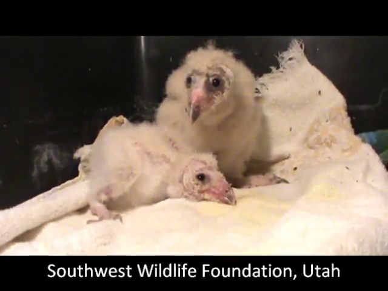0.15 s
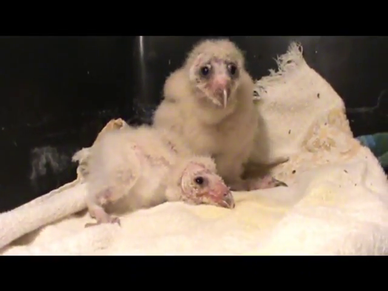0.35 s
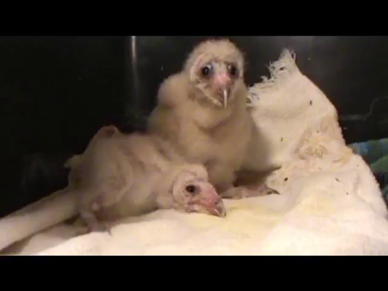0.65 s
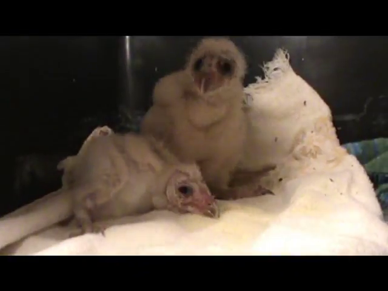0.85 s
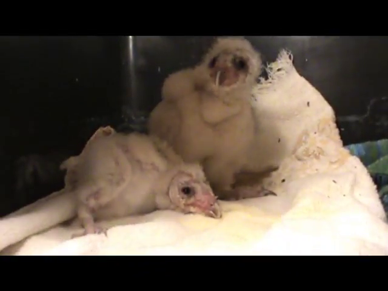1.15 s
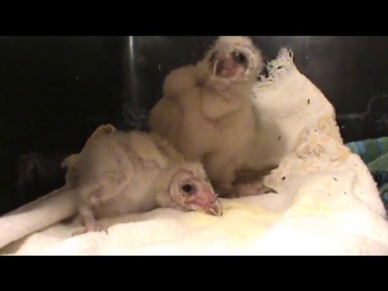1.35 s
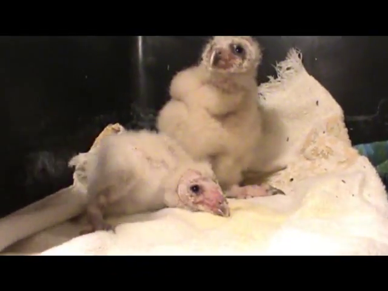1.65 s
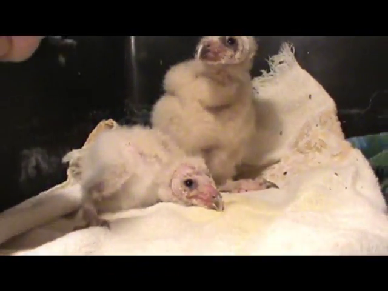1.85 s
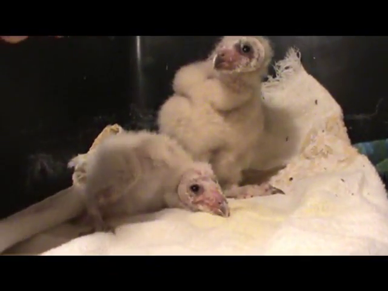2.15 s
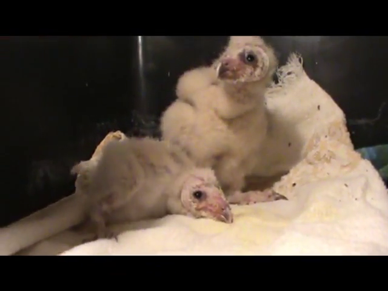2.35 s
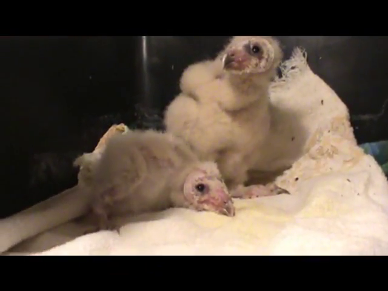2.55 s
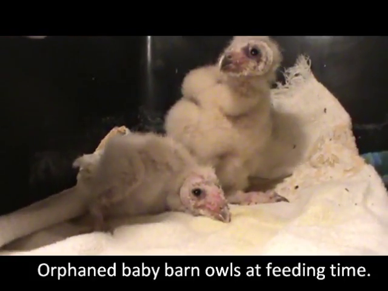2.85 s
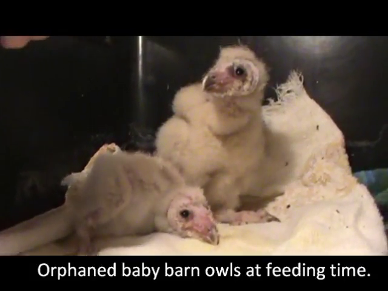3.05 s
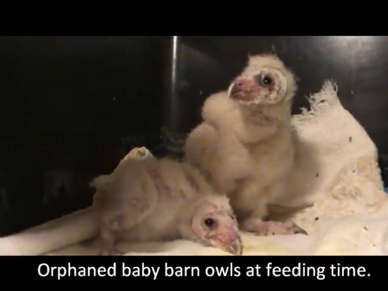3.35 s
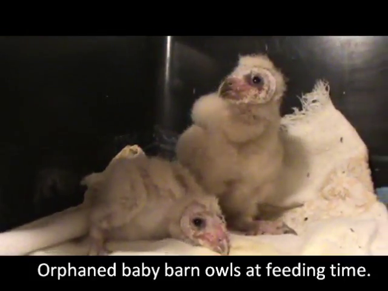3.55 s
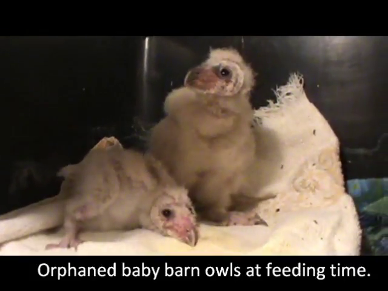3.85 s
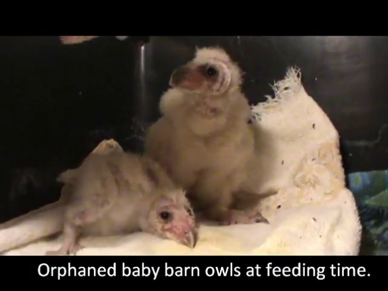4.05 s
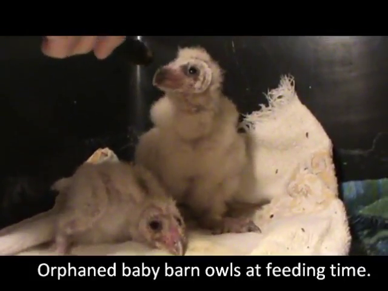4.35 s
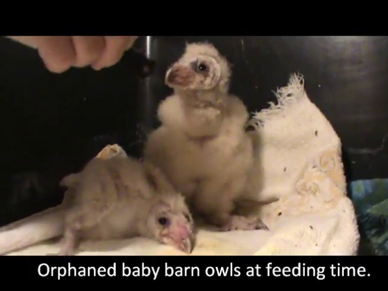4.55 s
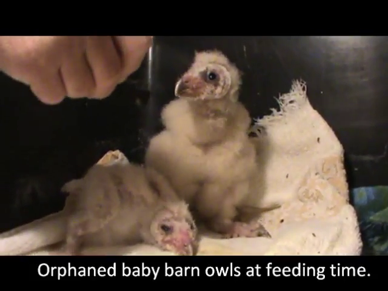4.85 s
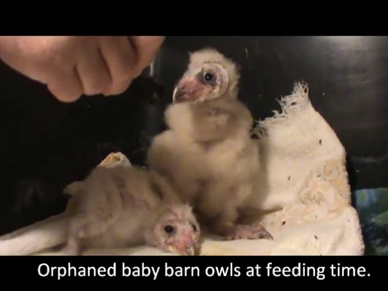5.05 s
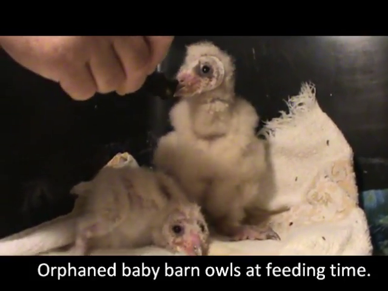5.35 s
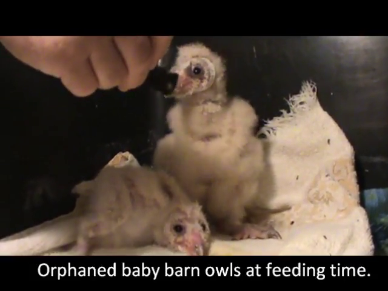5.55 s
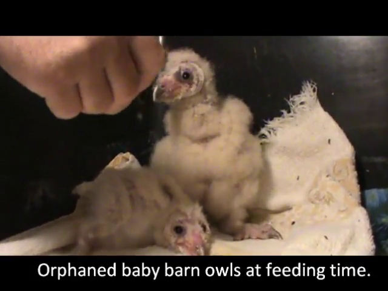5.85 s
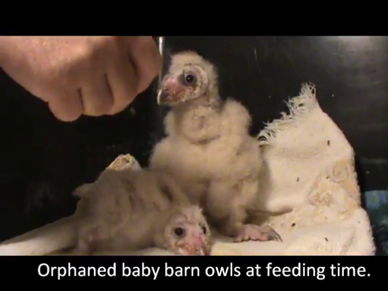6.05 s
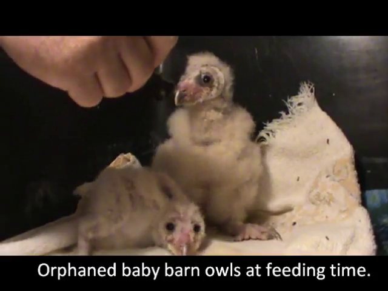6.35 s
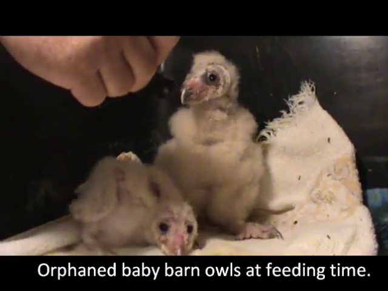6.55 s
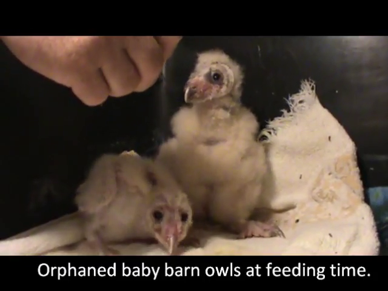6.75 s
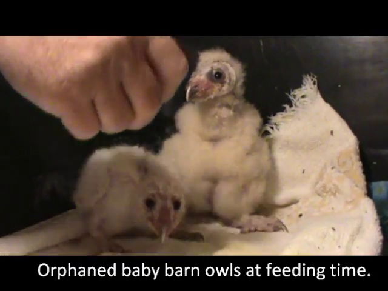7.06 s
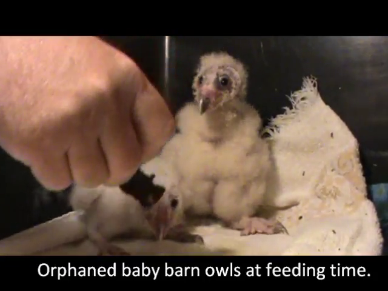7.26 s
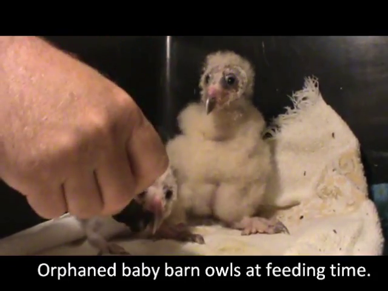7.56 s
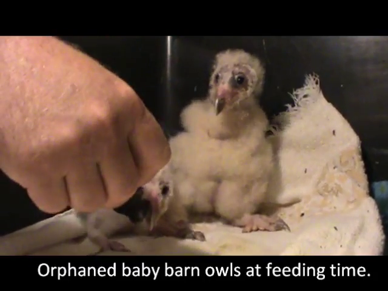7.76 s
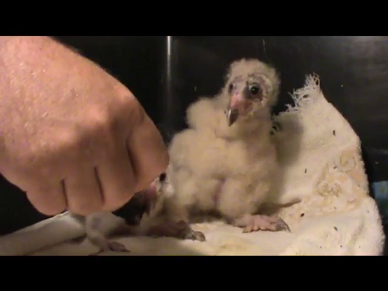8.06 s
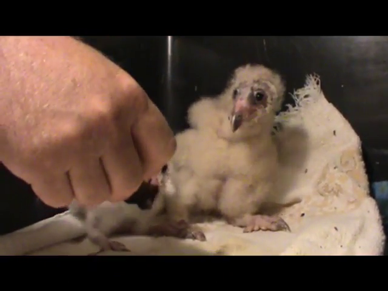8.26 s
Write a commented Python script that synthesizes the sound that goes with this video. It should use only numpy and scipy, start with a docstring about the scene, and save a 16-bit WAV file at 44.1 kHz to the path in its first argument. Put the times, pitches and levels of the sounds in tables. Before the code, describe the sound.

Close stereo microphones in a small towel-lined steel cage indoors. After cloth rustling and a faint wheeze, a barn owl chick gives eight shrill trills, each about six tenths of a second, nearly one per second. Each is a fast chain of arched whistles with a piercing higher tone and raspy edge. Between them come towel shifts, tiny taps, scuffs and soft bumps, over quiet moving air and machine hum.

```python
"""Owl chick begging in a cage

A barn owl chick begs close by, in a steel cage lined with towels: a faint wheeze, then eight chittering trills.
Each trill is a chain of arched whistles; round the crests a second sine tone and puffs of raspy noise join in.
Echo taps and a short dense ring throw the sounds back. The towel rustles in swelling noise, taps and bumps
are damped sines, scuffs are dying noise, and steady sines hum like a machine over the noise of moving air."""
import sys
import numpy as np
from scipy import signal
from scipy.fft import rfft, irfft, next_fast_len
from scipy.io import wavfile
from scipy.ndimage import uniform_filter1d

SR = 44100
rng = np.random.default_rng(int(sys.argv[2]) if len(sys.argv) > 2 else 0)


def dump(signal):
    """Clip the signal to [-1, 1] and save it as 16-bit WAV at the path in sys.argv[1]."""
    limited = np.clip(np.atleast_2d(signal).T, -1, 1)
    pcm = np.round(limited * 32767).astype(np.int16)
    wavfile.write(sys.argv[1], SR, pcm)


N = 371322
TIME = np.arange(N) / SR
SIZE = next_fast_len(N, real=True)
FREQS = np.fft.rfftfreq(SIZE, 1 / SR)

# Spectrum of the moving air: (frequency [Hz], relative level [dB])
ROOM_COLOUR = [(15, -58), (25, -13.5), (69, -8.5), (108, -4), (169, -8.5), (351, -17.5), (445, -19.5),
               (494, -11.5), (676, -29.5), (812, -17), (975, -24), (1920, -25.5), (2930, -29), (3610, -42),
               (13000, -55)]
# Steady partials of the machine: (frequency [Hz], rms level [dB])
HUM_PARTIALS = [(100.7, -60), (118.3, -64), (201, -69), (240, -67), (1120, -80), (1906, -79), (2519, -80)]
# Likeness of left and right in diffuse noise: (frequency [Hz], likeness [0-1])
STEREO_LIKENESS = [(100, 1), (300, 0.89), (600, 0.35), (1200, 0.043), (3000, 0.31), (12000, 0.9)]
# Spectrum of the rustling towel: (frequency [Hz], relative level [dB])
TOWEL_COLOUR = [(100, -15), (200, -11.5), (340, -1), (410, -12.5), (500, -6), (700, -10), (1280, -13.5),
                (2500, -14), (3300, -15.5), (8000, -19), (13000, -22)]
# Shifts on the towel: (middle [s], half length to 1/e of the power [s], level [dB])
RUSTLES = [(0.49, 0.084, -51), (0.89, 0.2, -59.5), (1.52, 0.13, -52), (2.16, 0.38, -57), (3.246, 0.13, -59),
           (3.725, 0.56, -51.5), (4.4, 0.28, -76), (6.396, 0.3, -63), (7.34, 0.093, -54.5)]
# Spectrum of the faint wheeze: (frequency [Hz], relative level [dB])
WHEEZE_COLOUR = [(2700, -40), (3150, 0), (3350, 0), (3800, -40), (13000, -70)]
# Beat of each trill:
# (start [s], end [s], first trough [s], arch length [s], slowing [s per arch], rising share of an arch [0-1])
TRILL_BEATS = [(0.906, 1.522, 0.902, .079, 0, .71), (1.924, 2.562, 1.944, .0815, 0, .69),
               (2.871, 3.520, 2.887, .0775, .001, .65), (3.840, 4.398, 3.853, .0786, 0, .68),
               (4.781, 5.396, 4.796, .0797, 0, .59), (5.720, 6.289, 5.738, .080, 0, .64),
               (6.761, 7.437, 6.788, .086, -.001, .70), (7.812, 8.405, 7.829, .084, 0, .69)]
# Voice of each trill: (first trough pitch [Hz], swing before narrowing [Hz], octave level before the throat [dB],
# second tone base pitch [Hz], extra level at the onset [dB])
TRILL_VOICES = [(3380, 1012, -8, 7100, -8.5), (3610, 960, -5.5, 7260, -5.5), (3430, 920, -6.5, 7420, -10),
                (3404, 980, -7.5, 7640, -13), (3723, 670, -0.5, 7480, -5.5), (3504, 780, -1, 6720, 0),
                (4040, 750, -3, 6900, 5.5), (3530, 766, -7, 6980, -7.5)]
# How each trill is pushed, one list per trill; levels are drives, shaped further on:
# (time [s], crest pitch [Hz], whistle level [dB], second tone level [dB], rasp level [dB])
TRILL_EFFORTS = [
    [(0.96, 4610, -35.5, -39.5, -56), (1.03, 4575, -35, -34, -46.5), (1.11, 4494, -35, -34, -58),
     (1.27, 4452, -32.5, -31, -50.5), (1.44, 4460, -32, -30.5, -46.5), (1.50, 4394, -29, -54, -62)],
    [(2.00, 4540, -36, -34.5, -51.5), (2.25, 4493, -32.5, -26, -46.5), (2.42, 4567, -32, -24.5, -39.5),
     (2.48, 4424, -35.5, -55, -65), (2.55, 4110, -30, -70, -70)],
    [(2.93, 4805, -32.5, -29.5, -62), (3.01, 4600, -31, -25.5, -41.5), (3.18, 4570, -30.5, -25.5, -43.5),
     (3.26, 4547, -29.5, -32, -54), (3.50, 4450, -26.5, -39, -53)],
    [(3.91, 4925, -26.5, -31, -48), (4.13, 4640, -27.5, -25, -44.5), (4.23, 4800, -25.5, -22.5, -45),
     (4.31, 4790, -28, -41, -42.5), (4.37, 4430, -30, -62, -77.5)],
    [(4.85, 4677, -33, -32, -43.5), (5.09, 4490, -31, -34.5, -46.5), (5.25, 4388, -33, -56, -46),
     (5.33, 4410, -35.5, -60, -58), (5.39, 4010, -38.5, -70, -75)],
    [(5.79, 4670, -39, -47, -60), (5.87, 4565, -33.5, -60, -44.5), (6.20, 4460, -33.5, -39, -50.5),
     (6.27, 4336, -33.5, -71, -77)],
    [(6.82, 4405, -44, -77, -68), (7.11, 4340, -34, -42, -52.5), (7.18, 4550, -37, -44, -38.5),
     (7.30, 4678, -28.5, -36, -50), (7.42, 4430, -31.5, -62, -61)],
    [(7.90, 4460, -36.5, -60, -68), (7.97, 4576, -36.5, -36.5, -57), (8.05, 4257, -32.5, -71, -68),
     (8.23, 4330, -33, -33.5, -56), (8.38, 4170, -34.5, -78, -76)],
]
# Gain of throat and beak on the whistle and its overtones: (frequency [Hz], gain [dB])
THROAT_GAIN = [(3300, 11), (3600, -0.5), (3950, 6.5), (4350, 3), (4600, -2.5), (4800, -11), (5100, -24),
               (7000, -4), (8800, 4), (9400, -10.5), (10800, 5.5), (13000, -28.5)]
# Spectrum of the turbulence that rides on the whistle: (frequency [Hz], relative level [dB])
HISS_COLOUR = [(2000, -30), (3500, 1), (5000, -8), (6500, -16), (8500, 10), (10000, -6), (11500, 7),
               (13000, 2)]
# Spectrum of the rasp: (frequency [Hz], relative level [dB])
RASP_COLOUR = [(2000, -47), (3400, -21), (4500, 1.5), (5200, -6), (6200, 1), (7500, 2), (8700, 8),
               (9500, -8.5), (10300, -0.5), (11500, -16.5), (13000, -25)]
# First echoes from the steel walls: (delay [s], gain [ratio])
WALL_ECHOES = [(.0006, 0.026), (.00135, 0.21), (.00245, 0.34), (.0032, 0.21), (.0075, 0.27), (.0082, 0.053),
               (.014, 0.11)]
# Light taps with a hollow ring: (time [s], peak level before the cage [dB])
TAPS = [(1.712, -52), (2.174, -52), (2.316, -48.5), (2.502, -30.5), (4.127, -43), (4.193, -47.5),
        (4.436, -52), (4.459, -47.5), (4.52, -41.5), (4.67, -56), (5.47, -58)]
# Modes of that ring: (frequency [Hz], relative level [dB], 60 dB decay time [s])
TAP_MODES = [(755, 4.5, 0.039), (840, 10, 0.016), (970, 5, 0.017), (1140, -17, 0.028)]
# Soft bumps on the padded floor: (time [s], level before contact and decay [dB], frequency [Hz])
BUMPS = [(2.956, -46, 268), (3.143, -43, 257), (3.146, -43, 614), (3.158, -32.5, 167), (3.292, -32.5, 313),
         (3.31, -40.5, 263)]
# Short scuffs of beak and claws: (time [s], starting level [dB], 60 dB decay time [s])
SCUFFS = [(1.71, -41.5, 0.031), (2.174, -39.5, 0.049), (2.598, -48.5, 0.096), (3.148, -51, 0.24),
          (3.326, -48.5, 0.16), (5.837, -50, 0.16), (5.999, -51, 0.1), (6.399, -51, 0.18),
          (7.103, -50, 0.25), (7.829, -45, 0.13), (7.921, -44.5, 0.16)]
# Spectrum of the scuffs: (frequency [Hz], relative level [dB])
SCUFF_COLOUR = [(100, -16), (300, 3.5), (600, -3.5), (1100, -4), (2500, -6), (5000, -11), (13000, -47)]

ROOM_DB = -58.5
STIRRING_DB = -63.5  # down and towel are never quite still
WHEEZE_S, WHEEZE_HALF_S, WHEEZE_DB = 0.86, 0.08, -62.5  # middle, half length, level before the high-pass
TROUGH_POINT = 1.12  # exponent: arches have round tops and sharper troughs
NARROWING, NARROWING_S = .35, .11  # the swing shrinks by this share as the trill runs out
LEAD_HZ = 262  # a call slides gently down into its first trough
END_FALL_HZ, END_FALL_S = 524, 0.0247  # the pitch drops as the call gives out
ONSET_S, RELEASE_DB, RELEASE_S, GATE_S = 0.047, -6.5, 0.042, 0.0068
THIRD_DB = -21  # drive of the second overtone, before the throat
# the second tone and the rasp each sound in a window round each crest, centred slightly late
SECOND_LAG_S, SECOND_LENGTH_S, SECOND_EDGE_S = 0.0016, .023, 0.0015
SECOND_BEND, SECOND_BEND_S, SECOND_TOP_S = 0.068, .016, -0.00396  # droops by this share so far from its top
BEAT_TONE_DB = -22  # relative to the second tone
RASP_LAG_S, RASP_LENGTH_S, RASP_EDGE_S = 0.0017, 0.03, 0.0047
RASP_BOOST_DB, RASP_UNEVEN_DB, FULLY_ROUGH_DB = 7.5, 0.8, -49
HISS_DB = -28  # relative to the smoothed voice
BAND_EDGE_HZ = 13080


def amp(db):
    """Converts decibels to gain."""
    return 10 ** (np.asarray(db) / 20)


def unit(x):
    """Scales to rms 1."""
    return x / np.sqrt(np.mean(x ** 2) + 1e-20)


def read(points, hz):
    """Reads a curve on a log-frequency axis."""
    f, value = np.transpose(points)
    return np.interp(np.log(hz + 1), np.log(f), value)


def noise(colour, weight=1):
    """Noise of the given spectrum and rms 1, then weighted frequency by frequency."""
    gain = unit(amp(read(colour, FREQS)))
    spectrum = rfft(rng.standard_normal(SIZE)) * gain * weight
    return irfft(spectrum, SIZE)[:N]


def wide_noise(colour):
    """Diffuse noise at two microphones, shared and opposed parts set by the stereo likeness."""
    likeness = read(STEREO_LIKENESS, FREQS)
    mid = noise(colour, np.sqrt((1 + likeness) / 2))
    side = noise(colour, np.sqrt((1 - likeness) / 2))
    return np.array([mid + side, mid - side])


def wobble(count, rate_hz):
    """Smooth random motion of about rms 1, with little above the given rate."""
    hop = 16  # drawn at every 16th sample, then joined by straight lines
    size = next_fast_len(count // hop + 256)
    f = np.fft.rfftfreq(size, hop / SR)
    spectrum = rfft(rng.standard_normal(size)) * np.exp(-(f / rate_hz) ** 2)
    slow = unit(irfft(spectrum, size))
    return np.interp(np.arange(count) / hop, np.arange(size), slow)


def swell(t, half_s, edge_s):
    """A flat-topped window round t = 0 with soft edges."""
    return .5 - .5 * np.tanh((abs(t) - half_s) / edge_s)


def add(mix, s, sound):
    """Mixes a sound in at time s."""
    part = mix[max(round(s * SR), 0):][:len(sound)]
    part += sound[:len(part)]


def room():
    """Moving air as diffuse noise, and a machine hum of sines whose phases waver slightly."""
    hum = np.zeros(N)
    for hz, db in HUM_PARTIALS:
        waver = .5 * wobble(N, rate_hz=4.2)  # radians
        hum += amp(db) * np.sqrt(2) * np.sin(2 * np.pi * hz * TIME + waver)
    return hum + amp(ROOM_DB) * wide_noise(ROOM_COLOUR)


def towel():
    """Each shift swells and fades in power; fibres slip in small uneven clumps."""
    power = amp(STIRRING_DB) ** 2
    for s, half_s, db in RUSTLES:
        power = power + amp(db) ** 2 * np.exp(-((TIME - s) / half_s) ** 2)
    clumps = amp(1.02 * wobble(N, rate_hz=58))
    return np.sqrt(power) * clumps * wide_noise(TOWEL_COLOUR)


def wheeze():
    """A faint breath of narrow-band noise that leads into the first trill."""
    return amp(WHEEZE_DB) * swell(TIME - WHEEZE_S, WHEEZE_HALF_S, edge_s=0.013) * noise(WHEEZE_COLOUR)


def arches(t, first_s, period_s, slowing_s, rising):
    """The beat of a trill: steps (even at troughs, odd at crests) and the time from the arch's crest."""
    k = np.arange(-1, 11)
    troughs = first_s + period_s * k + slowing_s * k * (k - 1) / 2
    crests = troughs[:-1] + rising * np.diff(troughs)
    turns = np.c_[troughs[:-1], crests].ravel()
    step = np.interp(t, turns, np.arange(len(turns)) - 2)
    arch = np.maximum(step // 2, 0).astype(int) + 1
    return step, t - crests[arch]


def whistle_pitch(t, step, swing, opening_hz, swing_hz, crest_hz):
    """Pitch arches from trough to crest, after a slide in and before a last fall."""
    narrowing = NARROWING * np.exp((t - t[-1]) / NARROWING_S)
    trough_hz = np.where(step < 1, opening_hz, crest_hz - swing_hz * (1 - narrowing))
    arch_hz = (crest_hz - trough_hz) * swing * (step >= 0)
    lead_hz = LEAD_HZ * np.clip(-step, 0, 1)
    fall_hz = END_FALL_HZ * np.maximum(1 - (t[-1] - t) / END_FALL_S, 0) ** 2
    return trough_hz + arch_hz + lead_hz - fall_hz


def whistle(t, step, opening_hz, swing_hz, octave_db, crest_hz, level_db, rough):
    """A whistle and two overtones through the throat; rough (0-1) shakes the pitch and weakens the lowest."""
    swing = abs(np.sin(np.pi / 2 * step)) ** TROUGH_POINT
    hz = whistle_pitch(t, step, swing, opening_hz, swing_hz, crest_hz)
    jitter = .003 + .022 * rough ** 2  # rms share of the pitch
    phase = 2 * np.pi * np.cumsum(hz * (1 + jitter * wobble(len(t), rate_hz=790))) / SR
    # the downstroke is pushed hardest; the voice eases as it turns to climb again
    falling = np.clip(-np.sin(np.pi * step), 0, 1) * (step > 0)
    easing = np.exp(-((step % 2 - .15) / 0.39) ** 2)
    first_db = read(THROAT_GAIN, hz) + 4.3 * falling - 1.75 * easing - 0.68 * rough - 2.2
    second_db = read(THROAT_GAIN, 2 * hz) + octave_db - 7.0 * (1 - swing) - 0.75
    third_db = read(THROAT_GAIN, 3 * hz) + THIRD_DB + 2.9 * wobble(len(t), rate_hz=110)
    tone = amp(first_db) * np.sin(phase)
    tone += amp(second_db) * np.sin(2 * phase)
    tone += amp(third_db) * np.sin(3 * phase)
    flutter_db = 1.5 * wobble(len(t), rate_hz=120)
    return tone * amp(level_db + flutter_db), phase


def second_tone(from_crest, hz, db, whistle_phase):
    """A brief higher whistle arches with each crest and mixes with the main one into a third, higher tone."""
    t = from_crest - SECOND_LAG_S
    droop = SECOND_BEND * np.minimum(((t - SECOND_TOP_S) / SECOND_BEND_S) ** 2, 2)
    shake = .007 * wobble(len(t), rate_hz=700)
    drift = .008 * wobble(len(t), rate_hz=10)
    pitch = hz * (1.014 - droop + shake + drift)
    level = amp(db + 2.4 * wobble(len(t), rate_hz=250))
    strength = level * swell(t, SECOND_LENGTH_S / 2, SECOND_EDGE_S)
    phase = 2 * np.pi * np.cumsum(pitch) / SR
    beat_tone = amp(BEAT_TONE_DB) * np.sin(2 * phase - whistle_phase)
    return strength * (np.sin(phase) + beat_tone)


def rasp_strength(from_crest, db):
    """Uneven roughness that breaks out round each crest."""
    uneven_db = RASP_UNEVEN_DB * wobble(len(from_crest), rate_hz=29)
    return amp(db + uneven_db) * swell(from_crest - RASP_LAG_S, RASP_LENGTH_S / 2, RASP_EDGE_S)


def trill(beat, voice, effort):
    """One call: its two tones, and the strength of the rasp that breaks out round the crests."""
    start, end, *timing = beat
    opening_hz, swing_hz, octave_db, second_hz, onset_db = voice
    t = np.arange(start, end, 1 / SR)
    times, *columns = np.transpose(effort)
    crest_hz, level_db, second_db, rasp_db = (np.interp(t, times, column) for column in columns)
    level_db = level_db + onset_db * np.maximum(1 - (t - start) / ONSET_S, 0)
    level_db = level_db + RELEASE_DB * np.maximum(1 - (end - t) / RELEASE_S, 0)
    step, from_crest = arches(t, *timing)
    rasp = rasp_strength(from_crest, rasp_db)
    rough = np.minimum(rasp / amp(FULLY_ROUGH_DB), 1)
    tone, phase = whistle(t, step, opening_hz, swing_hz, octave_db, crest_hz, level_db, rough)
    tone = tone + second_tone(from_crest, second_hz, second_db, phase)
    gate = np.clip(np.minimum(t - start, end - t) / GATE_S, 0, 1)
    return tone * gate, rasp * gate


def hiss(voice):
    """Thin turbulence that follows the loudness of the voice."""
    loudness = uniform_filter1d(abs(voice), size=400)  # about 9 ms
    return amp(HISS_DB) * loudness * noise(HISS_COLOUR)


def ragged(colour, patchy_db, count):
    """Noise whose energy hops between neighbouring bands every few milliseconds."""
    centres = np.linspace(4000, 11500, count)  # Hz
    total = np.zeros(N)
    for share in np.eye(count):
        band = noise(colour, np.sqrt(np.interp(FREQS, centres, share)))
        total += band * amp(patchy_db * wobble(N, rate_hz=123))
    return unit(total)


def rasp_noise(strength):
    """Patchy noise sputters in uneven puffs under the rasp strength."""
    puffs = amp(1.53 * wobble(N, rate_hz=640))
    return amp(RASP_BOOST_DB) * strength * ragged(RASP_COLOUR, patchy_db=7.0, count=8) * puffs


def chick():
    """The wheeze and all the trills, with their second tone, hiss and rasp."""
    voice, rasp = np.zeros(N), np.zeros(N)
    for beat, pitches, effort in zip(TRILL_BEATS, TRILL_VOICES, TRILL_EFFORTS):
        tones, strength = trill(beat, pitches, effort)
        add(voice, beat[0], tones)
        add(rasp, beat[0], strength)
    voice += hiss(voice)
    voice += rasp_noise(rasp)
    voice += wheeze()
    # so small a throat radiates almost nothing below the whistle
    highpass = signal.butter(N=10, Wn=3300, btype="high", fs=SR, output="sos")
    return signal.sosfilt(highpass, voice)


def cage(x, t60, tail_db, spread_db):
    """Single echoes from the near walls, and a short dense ring that differs a little left and right."""
    t = TIME[:SR // 3]
    sparse = rng.random((3, len(t))) < .1
    taps = rng.standard_normal((3, len(t))) * sparse * amp(-60 * t / t60) * (t > .003)
    shared, left, right = taps / np.linalg.norm(taps, axis=1, keepdims=True)
    response = amp(tail_db) * shared + amp(spread_db) * np.array([left, right])
    response[:, 0] += 1  # direct sound
    for k, (delay, gain) in enumerate(WALL_ECHOES):
        # a side wall reaches one microphone slightly before the other
        near, far = k % 2, 1 - k % 2
        response[near, round(delay * SR)] += gain
        response[far, round(delay * SR) + 1] += gain
    return signal.fftconvolve(x[None], response, axes=1)[:, :N]


def taps_and_bumps(t):
    """Taps ring a few short modes, bumps one low damped mode; both start with a soft contact."""
    out = np.zeros(N)
    ring = sum(amp(db - 60 * t / t60) * np.sin(2 * np.pi * hz * t) for hz, db, t60 in TAP_MODES)
    ring *= 1 - np.exp(-t / 0.0047)
    ring /= abs(ring).max()
    for s, db in TAPS:
        add(out, s, amp(db) * ring)
    for s, db, hz in BUMPS:
        decay = amp(db - 60 * t / 0.065)
        add(out, s, decay * (1 - np.exp(-t / 0.0018)) * np.sin(2 * np.pi * hz * t))
    return cage(out, t60=0.13, tail_db=-34, spread_db=-9.5)


def scuffs(t):
    """Scrapes of beak and claws: diffuse noise in puffs that start fast and die away."""
    scrape = np.zeros(N)
    for s, db, t60 in SCUFFS:
        add(scrape, s, amp(db - 60 * t / t60) * (1 - np.exp(-t / 0.00043)))
    return scrape * wide_noise(SCUFF_COLOUR)


def knocks():
    """Small contacts in the cage, each a quarter of a second at most before any echoes."""
    t = TIME[:SR // 4]
    return taps_and_bumps(t) + scuffs(t)


def scene():
    """The chick in its cage, a touch louder on the left, over small movements and the room."""
    balance = amp([[.15], [-.15]])  # dB, left and right
    calls = cage(chick(), t60=0.13, tail_db=-11.5, spread_db=-16.0) * balance
    return calls + knocks() + towel() + room()


def record(dry):
    """Low-passes the sound at the band edge with a linear-phase filter."""
    lowpass = signal.firwin(301, BAND_EDGE_HZ, window=("kaiser", 8), fs=SR)
    return signal.oaconvolve(dry, lowpass[None], "same", axes=1)


dry = scene()
out = record(dry)
dump(out)
```